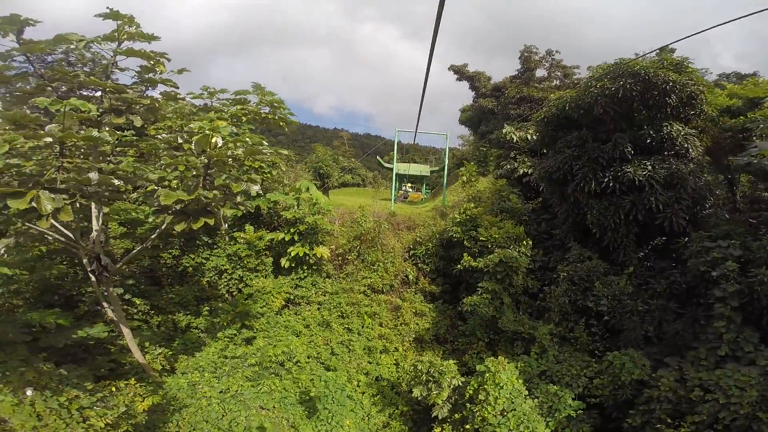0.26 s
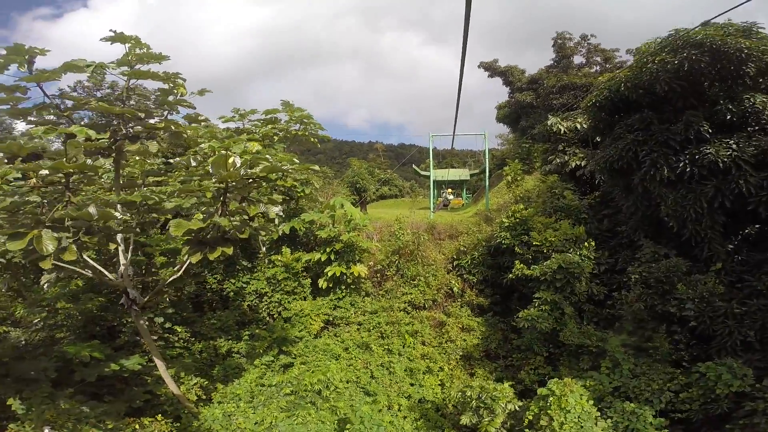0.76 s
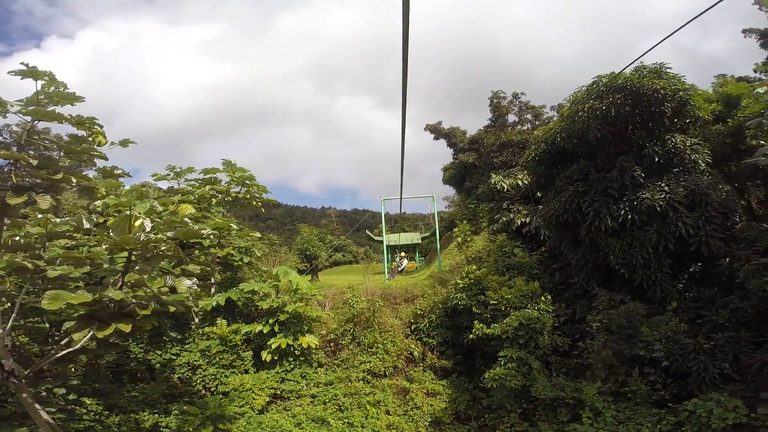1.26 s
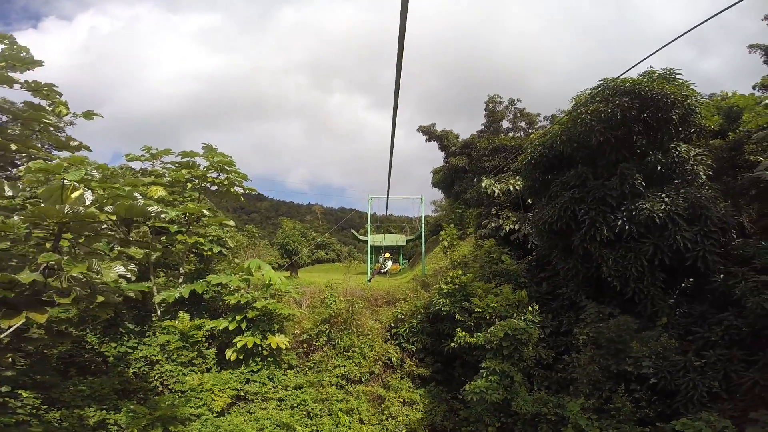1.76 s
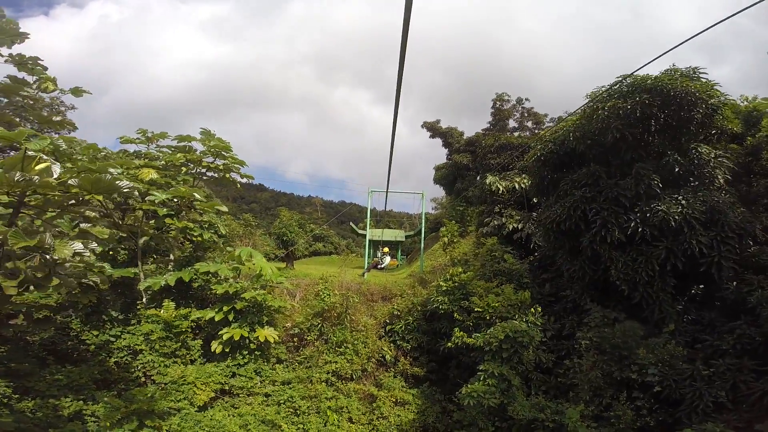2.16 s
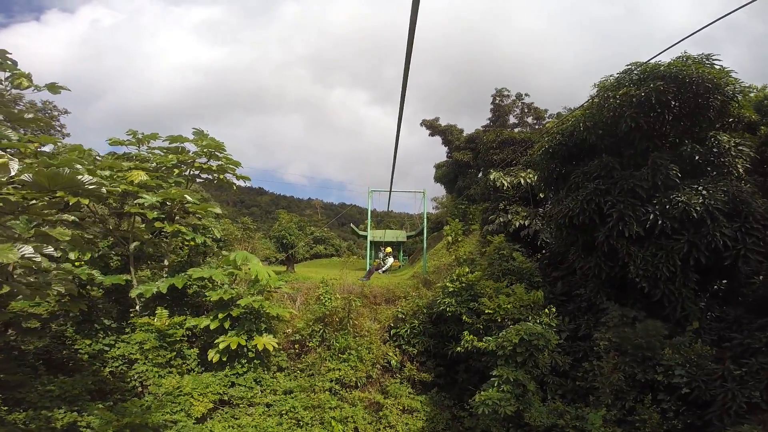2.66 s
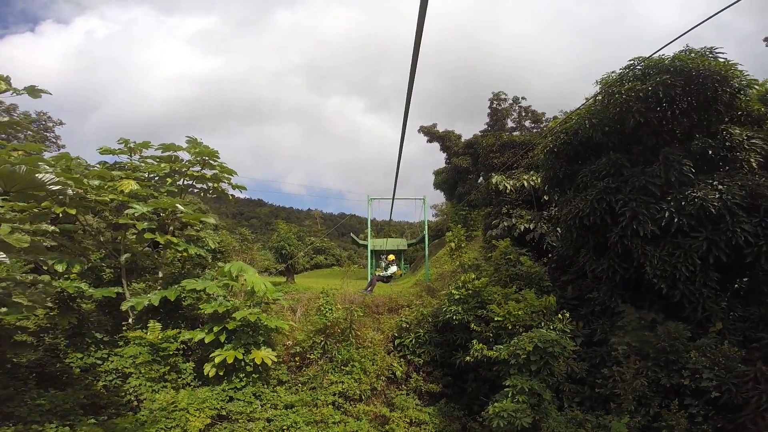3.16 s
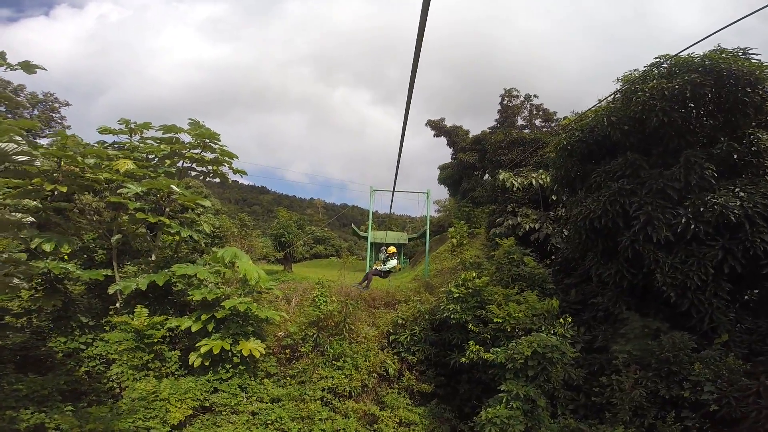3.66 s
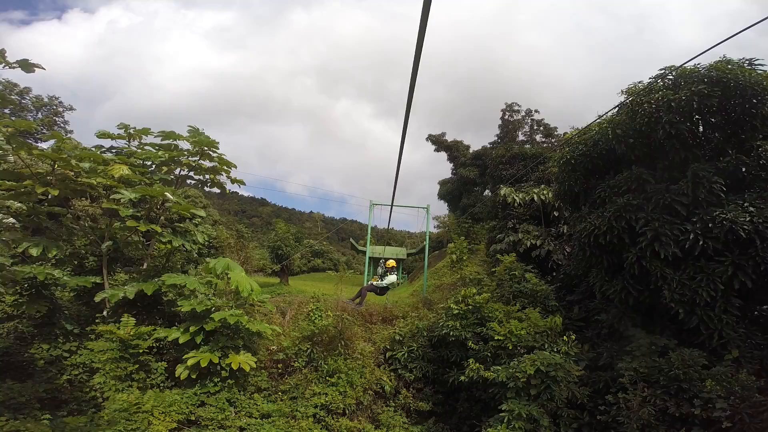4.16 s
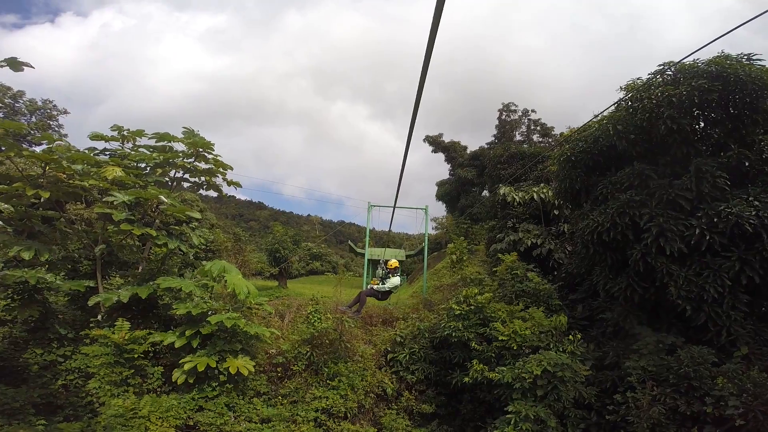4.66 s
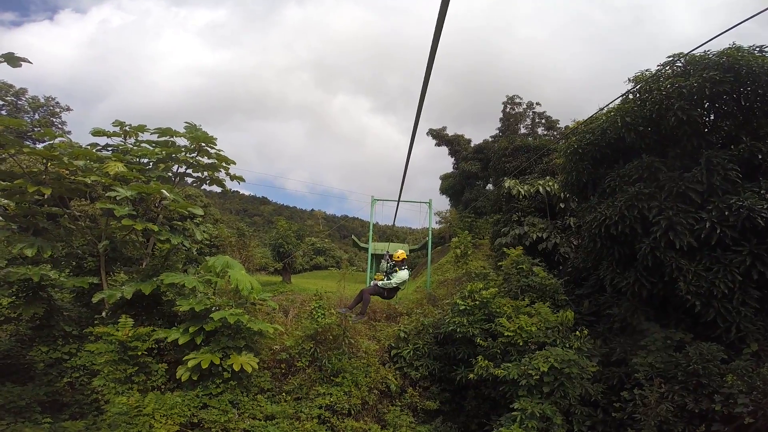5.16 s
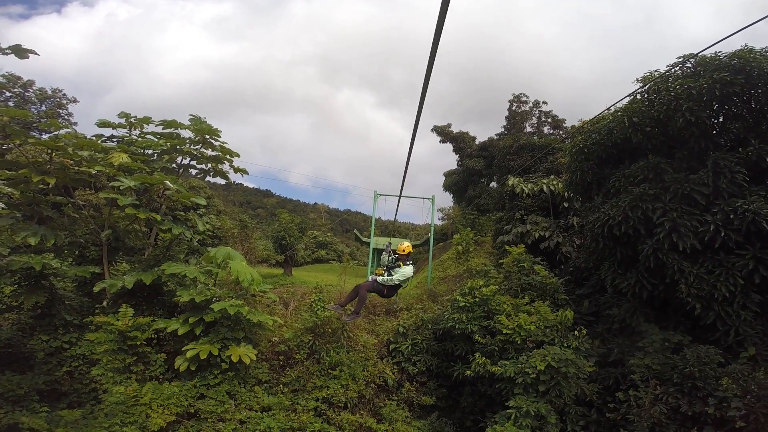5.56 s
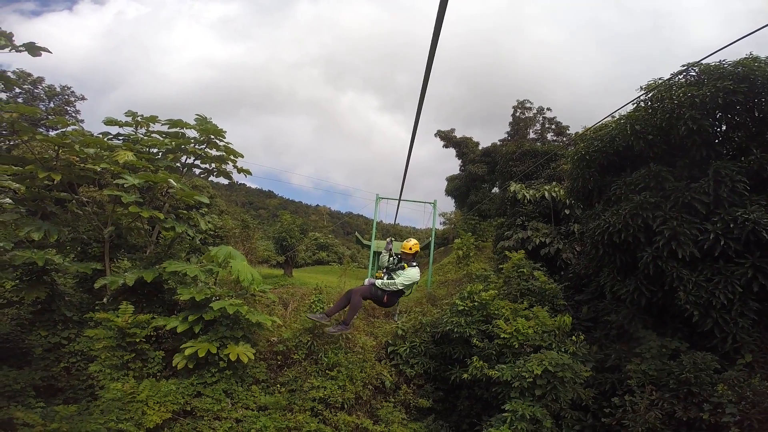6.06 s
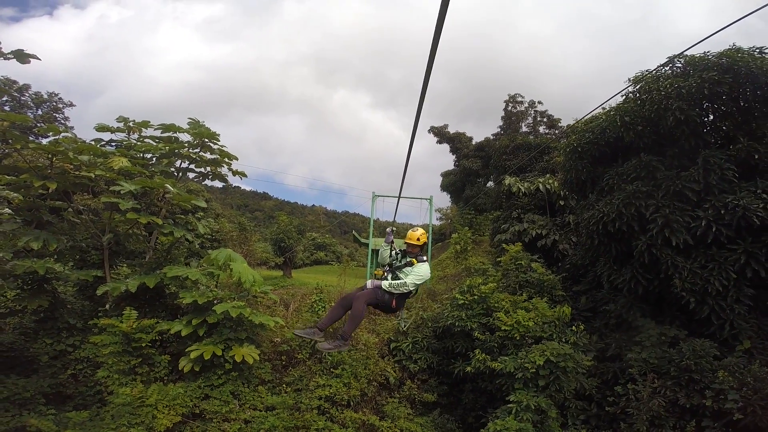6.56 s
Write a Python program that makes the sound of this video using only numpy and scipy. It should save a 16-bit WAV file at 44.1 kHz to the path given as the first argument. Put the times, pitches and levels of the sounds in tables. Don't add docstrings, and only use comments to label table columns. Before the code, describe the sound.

Close on a moving zipline, two trolley wheels roll over a twisted steel cable, making a fast, buzzing, ringing whir strongest in the upper mids. The nearer one slows and weakens while the farther one keeps whirring. Irregular metallic knocks and tiny bright ticks stand out. Wind pushes and hums low against the camera housing, with soft leafy air and faint harness snaps. Open forest, no echo.

```python
import sys
import numpy as np
from scipy import signal
from scipy.io import wavfile

SR = 44100
rng = np.random.default_rng(int(sys.argv[2]) if len(sys.argv) > 2 else 0)


def unload_wav(signal):
    wavfile.write(
        sys.argv[1],
        SR,
        np.round(np.clip(np.atleast_2d(signal).T, -1, 1) * 32767).astype(np.int16),
    )


def elevation(decibels):
    levels = np.asarray(decibels, float)
    return 10 ** (levels / 20)


N = 301203

STEEL_HZ = [1090, 1530, 2290, 2430, 2600, 2800, 3060, 3330, 3540, 3910, 4260, 4850, 5500, 5750, 6000, 6470,
            7000, 7550, 8750, 9480, 10400, 11050, 11500]
# width in Hz, level in dB from the nearer trolley, in dB from the farther
STEEL = [(196, -1.5, -4.5), (242, -3, -9.5), (184, -29, -34), (227, 12.5, 6.5), (220, 10.5, -36),
         (397, 11.5, 6.5), (263, 10.5, 12.5), (466, 8, 3.5), (229, 12, 8), (187, 10.5, -1), (300, -21, 0.5),
         (540, -0.5, -2.5), (427, -5.5, -3), (630, -0.5, -4.5), (450, -26, -0.5), (298, -9, -5),
         (520, -43, -11), (590, -6, -17), (720, -11, -17.5), (650, -15.5, -14), (1220, -40, -19.5),
         (300, -10.5, -45), (900, -44, -52)]
NEAR_COLUMN, FAR_COLUMN = 1, 2


def rms_one(x):
    return x / np.sqrt(np.mean(x ** 2) + 1e-20)


def in_time(rows):
    s, *columns = np.transpose(rows)
    return [np.interp(np.arange(N) / SR, s, column) for column in columns]


def drift(rate_hz):
    hold = 40
    r = np.exp(-2 * np.pi * hold * rate_hz / SR)
    settle = 2000
    slow = signal.lfilter([1], [1, -2 * r, r * r], rng.standard_normal(N // hold + settle + 2))[settle:]
    return np.interp(np.arange(N) / hold, np.arange(len(slow)), rms_one(slow))


def resonate(x, hz, width_hz):
    r = np.exp(-np.pi * width_hz / SR)
    zeros = np.array([1, 0, -1]) * (1 - r * r) / 2
    stage = np.r_[zeros, 1, -2 * r * np.cos(2 * np.pi * hz / SR), r * r]
    return signal.sosfilt([stage, stage], x)


def band(x, low_hz, high_hz):
    return signal.sosfilt(signal.butter(2, [low_hz, high_hz], "band", fs=SR, output="sos"), x)


def puffs(rows, attack_s, release_s, sag_db_per_s, rest_db):
    t = np.arange(N) / SR
    power = elevation(rest_db) ** 2
    for s, length, db, *_ in rows:
        rise = np.clip((t - s) / attack_s + .5, 0, 1)
        fall = np.exp(-np.maximum(t - s - length, 0) / release_s)
        from_middle = (t - s - length / 2).clip(-1, 1)
        power = power + (elevation(db - sag_db_per_s * from_middle) * rise * fall) ** 2
    return np.sqrt(power)


def wheel(per_s, column, knock_db, spread_db, depth, jitter, tilt_db, smear_s, own_db, lag_s,
          bright_db=0, frame_db=0, low_db=0):
    knock_limit_db = 8
    turn = np.cumsum(per_s) / SR + jitter * drift(30)
    at = np.flatnonzero(np.diff(np.maximum.accumulate(np.floor(turn))) > 0)
    size, sharp = drift(25)[at], drift(30)[at]
    swell_db = depth * np.cos(2 * np.pi * (turn - .15)) + drift(31)
    grind = rng.standard_normal((2, N))
    out = 0
    for k, (hz, row) in enumerate(zip(STEEL_HZ, STEEL)):
        octave = np.log2(hz / 3000)
        force = grind[k % 2] * elevation(swell_db * (1 + 0.11 * octave))
        own, late = rng.standard_normal((2, len(at)))
        delay_s = smear_s * late * 2 ** -octave + lag_s * (2 - octave)
        when = np.clip(at + (SR * delay_s).astype(int), 0, N - 1)
        change_db = spread_db * size + 2.0 * sharp * octave + own_db * own
        force[when] += elevation(knock_db + tilt_db * octave + np.minimum(change_db, knock_limit_db))
        lift_db = bright_db * (hz > 5000) + frame_db * (3200 < hz < 3700) + low_db * (1300 < hz < 2000)
        gain = elevation(row[column] + lift_db + 1.3 * drift(1.5))
        out = out + (-1) ** k * gain * resonate(force, hz, row[0])
    return rms_one(out)


def near_trolley(per_s, speed_octaves):
    # time in seconds, level in dB
    near_level = [(0, -44.5), (.52, -48.5), (.93, -48), (1.51, -48.5), (2.09, -52), (2.41, -50.5),
                  (2.78, -50), (3.07, -54), (3.5, -63), (5.5, -51.5), (6.83, -81)]
    level_db, = in_time(near_level)
    rolling = wheel(per_s, NEAR_COLUMN, knock_db=17.0, spread_db=4.0, depth=1.6, jitter=0.089, tilt_db=1.0,
                    smear_s=0, own_db=6.5, lag_s=0, bright_db=2.1 * speed_octaves, low_db=12.7 * speed_octaves)
    return elevation(level_db) * rolling


def far_trolley(per_s):
    # time in seconds, level in dB, bright contact in dB, frame ring in dB
    far_level = [(0, -56, 3, 5), (.55, -50, 2.5, 4), (1.25, -52, 0.5, 8.5), (1.77, -54, 3, 8),
                 (2.0, -47, -2, -1), (2.4, -52.5, 2, 5.5), (2.83, -51.5, 2.5, -19), (3.08, -50.5, 1, -1.5),
                 (3.55, -47.5, -1.5, -3), (3.92, -49, 1.5, 0), (4.3, -50.5, 1.5, 4), (4.7, -49, 3, 4),
                 (4.98, -50, 3.5, 1.5), (5.32, -47.5, 1, -5), (5.59, -47, -1, -6), (5.9, -48, 1.5, -3),
                 (6.15, -51, 4, -1), (6.83, -49, -2, 0.5)]
    level_db, bright_db, frame_db = in_time(far_level)
    rolling = wheel(per_s, FAR_COLUMN, knock_db=16.0, spread_db=3.5, depth=2.9, jitter=.03, tilt_db=2.5,
                    smear_s=.0003, own_db=4.5, lag_s=.0015, bright_db=bright_db, frame_db=frame_db)
    return elevation(level_db) * rolling


def gusts():
    # time in seconds, push level in dB
    gust_level = [(0.0, -56.5), (0.23, -42.5), (0.59, -50.5), (1.54, -42), (1.73, -53.5), (2.22, -33.5),
                  (3.1, -51.5), (3.92, -44.5), (4.05, -54), (4.22, -39.5), (4.45, -44.5), (4.62, -31),
                  (4.77, -41.5), (5.4, -36.5), (5.59, -61), (6.01, -41), (6.6, -33), (6.83, -40)]
    push_db, = in_time(gust_level)
    white = rng.standard_normal((2, N + SR))
    push = band(band(white[0], 5.1, 17.7), 4.8, 19.1)[SR:]
    push = rms_one(np.tanh(1.46 * rms_one(push)))
    eddies = rms_one(band(white[1], 32.0, 52)[SR:])
    return elevation(push_db) * (push + elevation(-14.5) * eddies)


def housing_hum():
    # start in seconds, length in seconds, level in dB, pitch in Hz
    hum_bursts = [(0, 0.037, -54.5, 46.3), (0.283, .04, -46.5, 51.9), (0.436, 0.035, -37, 61.2),
                  (0.502, .31, -45, 66), (0.848, .12, -50.5, 69.97), (1.071, 0.08, -46, 60.5),
                  (1.394, .07, -50, 52.3), (1.566, 0.15, -50.5, 60.2), (1.816, 0.41, -47.5, 56.3),
                  (2.349, 0.1, -45, 47.3), (2.583, 0.047, -40, 48.7), (2.801, .1, -52, 48.95),
                  (3.216, 0.13, -54.5, 62.3), (3.423, 0.075, -47.5, 51.65), (3.616, 0.35, -51, 44.93),
                  (4.152, 0.13, -47.5, 50.76), (4.379, 0.14, -46, 57.3), (4.558, .12, -45.5, 54),
                  (4.789, 0.33, -50.5, 58.13), (5.212, 0.19, -48, 53), (5.837, 0.23, -52, 53.35),
                  (6.247, .08, -50, 53.8), (6.492, 0.26, -52, 50.12)]
    hum_hz, = in_time([(s + length / 2, hz) for s, length, db, hz in hum_bursts])
    phase = 2 * np.pi * np.cumsum(hum_hz) / SR
    hum = rms_one((1.3 + drift(11)) * np.sin(phase) + drift(7.3) * np.cos(phase))
    return hum * puffs(hum_bursts, attack_s=0.014, release_s=0.057, sag_db_per_s=11.5, rest_db=-59.5)


def port_flutter():
    # start in seconds, length in seconds, level in dB
    flutter_bursts = [(0, 0.015, -48), (.40, 0.024, -54), (.48, 0.048, -54), (.9, .07, -55),
                      (1.03, 0.14, -48.5), (2.14, 0.13, -54.5), (2.4, 0.025, -53), (2.54, 0.086, -56),
                      (2.76, .04, -54.5), (3.1, 0.08, -58), (3.72, .05, -58), (3.9, 0.032, -56),
                      (4.25, 0.054, -57.5), (4.38, 0.1, -59), (4.52, .21, -53.5), (4.83, 0.047, -52.5),
                      (4.95, 0.063, -51.5), (5.11, .06, -51), (5.24, 0.14, -53.5), (5.99, .14, -57),
                      (6.22, 0.08, -52.5), (6.45, 0.096, -52.5), (6.6, .23, -54.5)]
    noise = band(band(rng.standard_normal(N), 180, 340), 165, 360)
    flutter = rms_one(elevation(1.5 * drift(15)) * noise)
    gain = puffs(flutter_bursts, attack_s=0.0085, release_s=.02, sag_db_per_s=0, rest_db=-66.5)
    return elevation(-4.5) * flutter * gain


def air():
    # frequency in Hz, density in dB per Hz
    air_spectrum = [(60, 7), (100, -2.5), (170, -4.5), (350, -9.5), (700, -12), (1300, -15.5), (2040, -18),
                    (3500, -29.5), (6000, -27), (9000, -53), (15000, -63)]
    hz, db = np.transpose(air_spectrum)
    edges = 70 * 2 ** np.arange(0, 8.1, .5)
    white = rng.standard_normal((2, N))
    out = 0
    for k, (low, high) in enumerate(zip(edges, edges[1:])):
        level_db = np.interp(np.log(low * high) / 2, np.log(hz), db)
        out = out + elevation(level_db + 0.31 * drift(4.5)) * band(white[k % 2], low, high)
    return elevation(-56.5) * rms_one(out)


def whine():
    # frequency in Hz, level in dB rms
    whine_lines = [(11658.4, -95), (11688.3, -88), (11718.3, -86), (11748.4, -96), (14625.4, -86),
                   (14655.4, -96), (11568.4, -98), (11838, -100), (8781.5, -93)]
    t = np.arange(N) / SR
    return sum(np.sqrt(2) * elevation(db) * np.sin(2 * np.pi * (hz * t + rng.random())) for hz, db in whine_lines)


def rustle():
    # start in seconds, length in seconds, level in dB
    rustle_bursts = [
        (0, .4, -83),
        (2.62, .12, -86),
        (3.82, .12, -87),
    ]
    hiss = band(rng.standard_normal(N) * elevation(5.0 * drift(80)), 13000, 14300)
    return rms_one(hiss) * puffs(rustle_bursts, attack_s=.02, release_s=.03, sag_db_per_s=0, rest_db=-110)


def blows(times, peak_db, low_hz, high_hz, column, crack_db):
    clicks = np.full(N, 1e-18)
    clicks[np.minimum(np.round((times + .001) * SR).astype(int), N - 1)] = elevation(peak_db)
    rings = 0
    for hz, row in zip(STEEL_HZ, STEEL):
        if low_hz < hz < high_hz:
            rings = rings + elevation(row[column]) * resonate(clicks, hz, row[0])
    crack = clicks
    for _ in range(3):
        crack = band(crack, low_hz, high_hz)
    return rings + elevation(crack_db) * crack


def snaps():
    # time in seconds, peak in dB
    snap_events = [(0.0448, -62), (0.0907, -62), (0.1401, -66), (0.163, -65), (0.2613, -51), (0.3341, -64),
                   (0.3586, -66), (0.3815, -62), (0.5422, -74), (0.5611, -66), (0.8116, -62), (0.9388, -70),
                   (0.9777, -69), (1.4082, -68), (2.6468, -66), (2.7121, -71), (3.5666, -70), (3.886, -67),
                   (4.8047, -75), (5.1008, -74), (5.3746, -82), (5.4718, -66), (5.5939, -69), (6.6147, -67)]
    s, db = np.transpose(snap_events)
    return blows(s, db + 19, 12700, 14400, FAR_COLUMN, crack_db=0)


def hard_knocks():
    # time in seconds, peak in dB
    knock_events = [(0.0985, -22.5), (0.4806, -19.5), (0.608, -21), (0.8867, -20), (1.1197, -22),
                    (1.1345, -18.5), (1.2391, -19.5), (1.269, -23), (1.311, -24), (1.42, -23), (1.514, -24),
                    (1.8093, -25), (1.845, -24.5), (2.221, -25), (2.277, -22), (2.4795, -33), (2.733, -20),
                    (2.7566, -21.5), (2.9556, -24.5), (3.0106, -25.5), (3.512, -27), (3.612, -24.5),
                    (4.0425, -29), (5.1804, -25), (5.6263, -21), (5.7429, -27), (5.908, -35), (6.0907, -28),
                    (6.1352, -26), (6.3733, -30)]
    s, db = np.transpose(knock_events)
    return blows(s, db + 5.5, 2090, 3880, NEAR_COLUMN, crack_db=4.5)


def seam(per_s):
    twists_per_turn = 9
    twists = np.cumsum(per_s) / SR
    count = int(twists[-1] / twists_per_turn)
    slip, size, middle = rng.standard_normal((count, 3)).clip(-1.5, 1.5).T
    twist = twists_per_turn * (np.arange(count) + .5) + np.round(2 * slip).clip(-4, 4)
    s = np.searchsorted(twists, twist) / SR
    return np.c_[s, -59 + 5.5 * size, -1 + 8.5 * middle]


def bright_ticks(far_per_s):
    # time in seconds, peak in dB, middle share in dB
    tick_events = [(0.2169, -48, -4), (0.4803, -49, 4), (1.2382, -53, 9), (1.292, -50, 2), (1.4341, -50, 1),
                   (1.4514, -48, 3), (1.7656, -50, 4), (1.9026, -52, -6), (2.2568, -47, -7),
                   (2.4953, -49, 5), (2.5897, -51.5, 7), (2.6738, -51, -1), (3.0826, -50.5, 4),
                   (3.486, -50, -7), (3.567, -51, -3), (3.63, -51, 1), (3.7128, -48, 5), (3.7422, -50, 3),
                   (3.933, -51, 2), (4.2255, -49, 4.5), (4.352, -50, -4), (5.1014, -50, 9),
                   (5.2594, -49, 3), (5.3753, -45, -5), (5.4036, -49, -7), (5.5957, -46, -9),
                   (5.6341, -48, -2), (5.7112, -48, 0), (5.8211, -48, 5), (6.3711, -51, 3)]
    s, db, middle_db = np.r_[tick_events, seam(far_per_s)].T
    top = blows(s, db + 41, 8400, 11300, FAR_COLUMN, crack_db=-45)
    middle = blows(s, db + middle_db + 31, 4600, 7000, FAR_COLUMN, crack_db=-35)
    return top + middle


def thumps():
    # time in seconds, peak in dB, pitch in Hz
    slap_events = [
        (0.433, -42, 64),
        (1.06, -39, 83),
        (4.492, -43.5, 70.9),
        (5.081, -47, 56.7),
        (6.274, -41.5, 67.8),
    ]
    t = np.arange(N) / SR
    out = 0
    for s, db, hz in slap_events:
        since = np.maximum(t - s, 0)
        envelope = since / 0.013 * np.exp(-since / 0.0089)
        out = out + elevation(db + 15.5) * envelope * np.sin(2 * np.pi * hz * since)
    return out


def scene():
    # time in seconds, twists passed per second
    far_speed = [(0, 95), (1, 94), (1.6, 90), (1.95, 94), (2.35, 96), (2.6, 94), (2.8, 97), (3.15, 93),
                 (3.6, 98), (4.1, 92.5), (4.5, 98), (4.75, 96.5), (5.1, 99.5), (5.5, 104.5), (5.9, 98),
                 (6.2, 92), (6.3, 85.5), (6.83, 84.5)]
    far_per_s, = in_time(far_speed)
    near_per_s = np.maximum(85.5 - 15.5 * np.arange(N) / SR, 37)
    speed_octaves = np.log2(near_per_s / 60)
    steel = near_trolley(near_per_s, speed_octaves) + far_trolley(far_per_s)
    steel = steel + hard_knocks() + bright_ticks(far_per_s)
    housing_cut_hz = 11900
    housing = signal.cheby2(8, 30, housing_cut_hz * 1.26, fs=SR, output="sos")
    steel = signal.sosfilt(housing, steel)
    wind = gusts() + housing_hum() + port_flutter() + thumps()
    rush = elevation(0.55 * speed_octaves) * air()
    return (steel + wind + rush + whine() + rustle() + snaps())[None]


def band_limit(x):
    return signal.sosfilt(signal.butter(12, 15210, fs=SR, output="sos"), x)


def record(dry):
    hiss_cut = signal.cheby1(6, .5, 14400, fs=SR, output="sos")
    hiss = signal.sosfilt(hiss_cut, rng.standard_normal(N))
    mix = dry + elevation(-74.5 + 0.66 * drift(6.7)) * hiss
    return band_limit(mix)


dry = scene()
out = record(dry)
unload_wav(out)
```